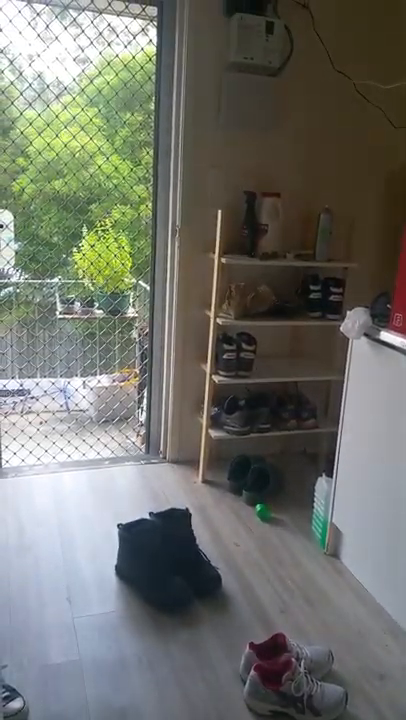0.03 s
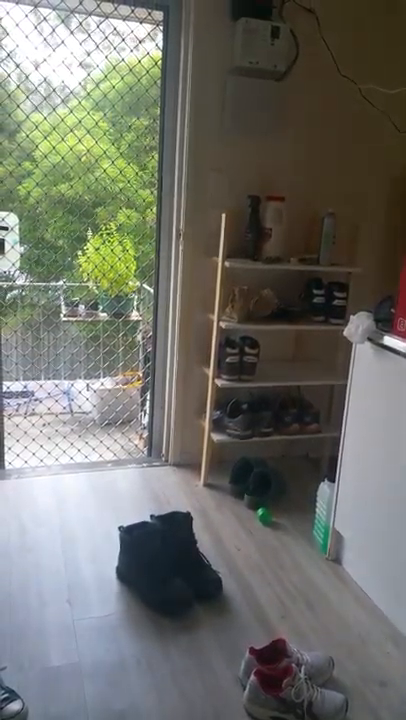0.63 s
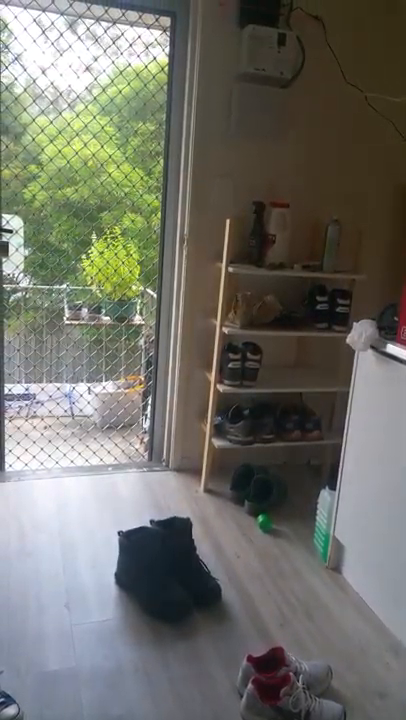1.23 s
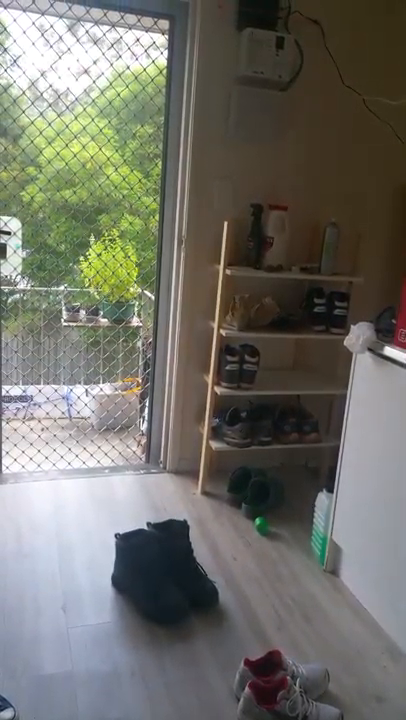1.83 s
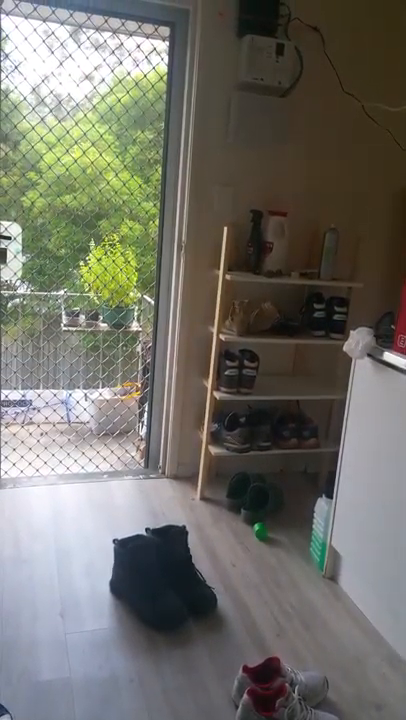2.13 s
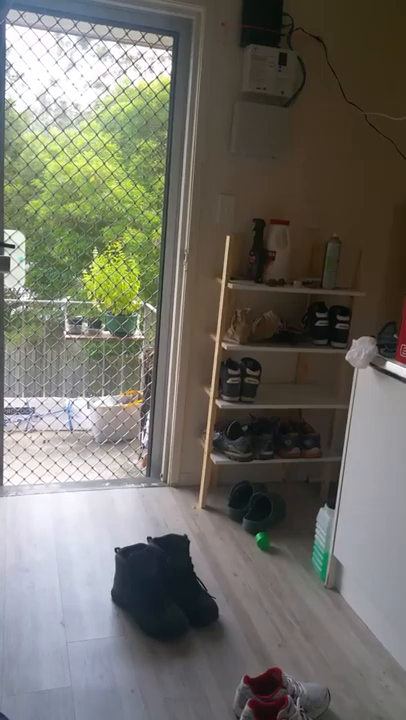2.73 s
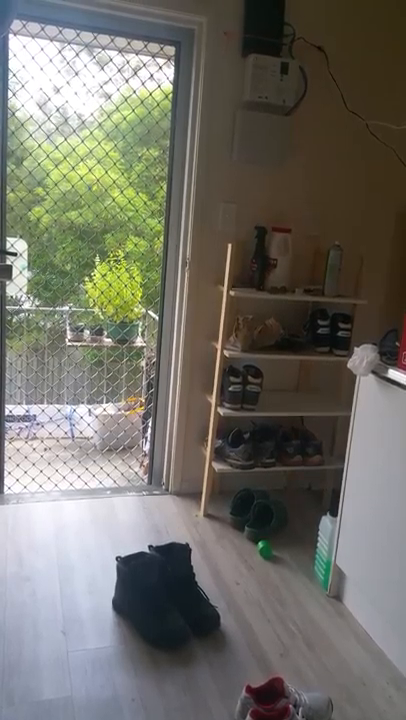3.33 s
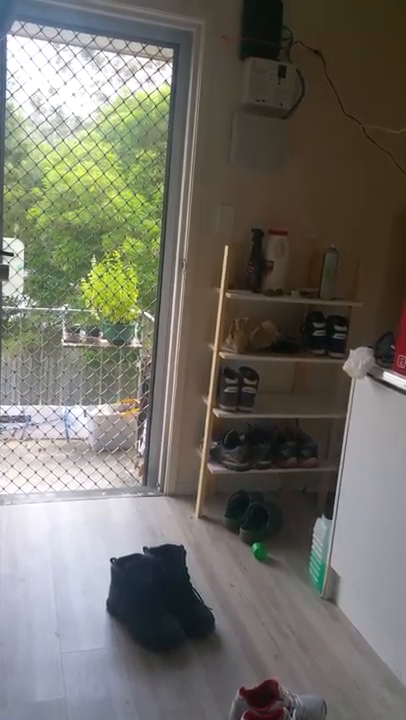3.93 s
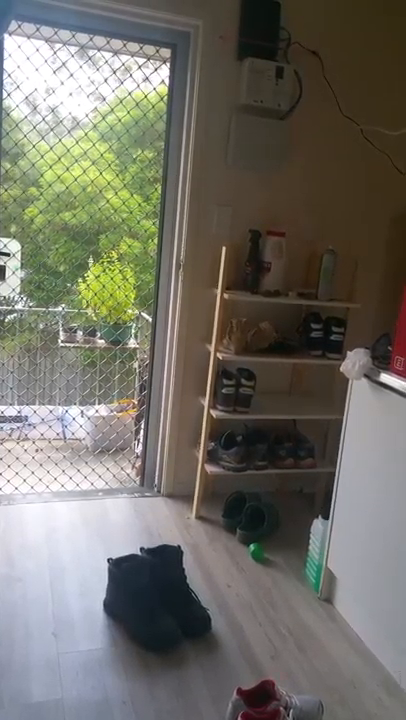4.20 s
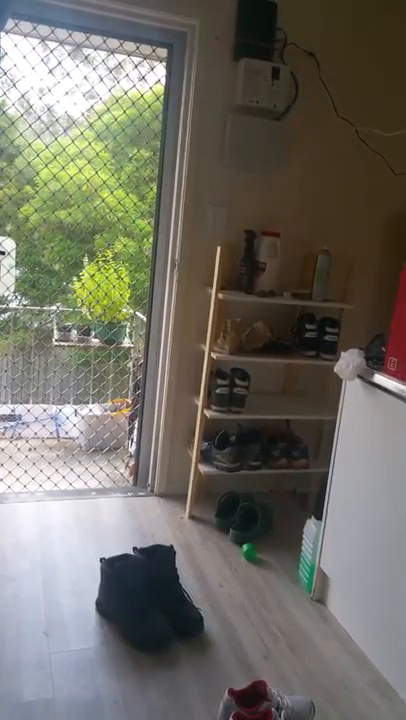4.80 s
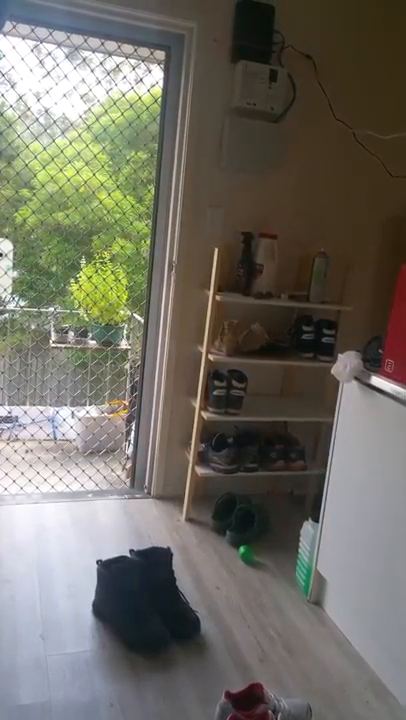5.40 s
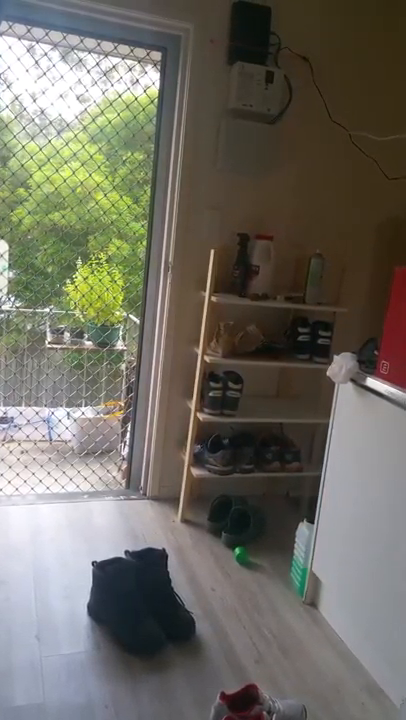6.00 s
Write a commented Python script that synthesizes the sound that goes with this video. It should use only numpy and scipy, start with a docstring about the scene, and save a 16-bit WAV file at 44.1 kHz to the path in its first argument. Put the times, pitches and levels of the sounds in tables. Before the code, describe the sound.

Soft outdoor hiss and distant traffic hum drift into a hallway through an open door. Close outside, a bird sings in short groups with pauses: sharp falling whistles, low hoots and fluting notes, with faint wails from a farther bird. After a loud wavering note and a final falling whistle, only the background and a slight nearby rustle remain. The microphone is indoors, where a short echo smears the notes.

```python
"""From a hallway with an open door: outdoor hiss and a low traffic hum throughout, and at first a faint murmur
of distant song. Just outside, a butcherbird whistles steep downward whips that crack as they break and end
in a soft hoot. Fluted notes come between them while another bird wails far off. One loud ringing note
leads to the last whip; a faint tick and rustle close the scene. The hard little room smears the slides
and makes the held notes throb."""
import sys
import numpy as np
from scipy import signal
from scipy.fft import rfft, irfft, next_fast_len
from scipy.io import wavfile
from scipy.ndimage import uniform_filter1d

SR = 44100
rng = np.random.default_rng(int(sys.argv[2]) if len(sys.argv) > 2 else 0)


def inscribe(sig):
    """Save sig as 16-bit PCM at rate SR to the path in sys.argv[1].

    A 1-D sig is mono; a 2-D sig holds one channel per row.
    Samples are clipped to [-1, 1] before scaling.
    """
    pcm = np.round(np.clip(np.atleast_2d(sig).T, -1, 1) * 32767)
    wavfile.write(sys.argv[1], SR, pcm.astype(np.int16))


N = 266893
TIME = np.arange(N) / SR
# Timbre of the ringing note. Each entry: relative level in dB, from harmonic 2 upward.
RING_TIMBRE = [-34, -41, -20, -36, -37.5, -52, -46, -53, -53, -46]


def undb(db):
    """Decibels to gain."""
    return 10 ** (np.asarray(db) / 20)


def unit(x):
    """Scale to rms 1."""
    return x / np.sqrt(np.mean(x ** 2))


def curves(rows):
    """Automation lanes: each column of a table, joined by straight lines in time."""
    times, *columns = np.transpose(rows)
    return [np.interp(TIME, times, column) for column in columns]


def along(hz, rows, axis=1):
    """One column of a table, read on a log-frequency axis."""
    rows = np.array(rows, float)
    return np.interp(np.log(hz + 1e-3), np.log(rows[:, 0]), rows[:, axis])


def colour(x, rows, axis=1):
    """EQ by a table of Hz and dB."""
    size = next_fast_len(x.shape[-1] + 2048)
    gain = undb(along(np.fft.rfftfreq(size, 1 / SR), rows, axis))
    return irfft(rfft(x, size) * gain, size)[..., :x.shape[-1]]


def walk(rate_hz):
    """Smooth random modulation of rms 1."""
    step = max(int(SR / rate_hz), 2)
    held = np.repeat(rng.standard_normal(N // step + 1), step)
    return unit(uniform_filter1d(uniform_filter1d(held, step), step)[:N])


def envelope(t, length_s, attack_s, release_s):
    """Attack, hold and release of a note that starts at t = 0."""
    return np.clip(np.minimum(t / attack_s, (length_s - t) / release_s), 0, 1)


def bell(centre_s, half_s):
    """A smooth swell of height 1."""
    return np.exp(-((TIME - centre_s) / half_s) ** 2)


def bursts(rows, spectrum):
    """Short swells of coloured noise."""
    swells = sum(undb(db) * bell(centre_s, half_s) for centre_s, db, half_s in rows)
    return swells * unit(colour(rng.standard_normal(N), spectrum))


def air(spectrum, db, sway_db):
    """A stereo noise bed that sways slightly, narrow in the bass and wide in the treble."""
    # Stereo image. Each row: frequency in Hz, likeness of the two sides from 0 to 1.
    likeness = [(60, 0.91), (180, 0.99), (350, 0.7), (700, 0.78), (1500, 0.23), (4000, 0), (12000, 0)]
    # Panning. Each row: frequency in Hz, left minus right in dB.
    balance = [(60, 2), (110, -0.5), (200, 1), (380, 1.5), (700, 0), (1290, 4.0), (2380, 8), (4400, -2),
               (8120, -3.5), (15000, 2.5)]
    hz, sign = np.fft.rfftfreq(N, 1 / SR), np.array([[1], [-1]])
    alike = along(hz, likeness)
    mid, side = rfft(rng.standard_normal((2, N)))
    pair = np.sqrt(1 + alike) * mid + sign * np.sqrt(1 - alike) * side
    eq = undb(along(hz, spectrum) + sign * along(hz, balance) / 2)
    return unit(irfft(pair * eq, N)) * undb(db + sway_db * walk(5.95))


def outdoors():
    """A low wash that slowly swells and sinks, under a quiet hiss."""
    # Colours of the wash and the hiss. Each row: frequency in Hz, relative level in dB.
    wash_eq = [(12, -39), (20, -9.5), (54, -4), (182, -9), (247, -7.5), (336, -14), (719, -13.5),
               (975, -17), (1050, -10.5), (1110, -21.5), (1200, -14), (1320, -16.5), (1900, -19),
               (2470, -52), (4180, -120)]
    hiss_eq = [(1000, -31), (1700, -12), (1780, -9.5), (1990, -0.5), (2270, -3.5), (2610, -6.5),
               (2780, -10.5), (3020, -7.5), (3440, -10), (3920, -5.5), (4680, -7.5), (6010, -15),
               (6720, -14), (8560, -26.5), (15600, -34.5)]
    # Fader ride of the wash. Each row: time in seconds, gain in dB.
    wash_ride = [(0, 0), (1.1, 1.5), (2.1, 0.5), (4.7, -0.5), (5.1, -1.5), (6.05, -1.3)]
    swell_db, = curves(wash_ride)
    return undb(swell_db) * air(wash_eq, db=-53, sway_db=1.4) + air(hiss_eq, db=-49.5, sway_db=0.6)


def traffic(hum_hz=62.4, waver=.025, throb_db=3, left_db=2.2):
    """A far engine drones, throbs and swells now and then; its octave grows near the end."""
    # Each row: centre in seconds, half length in seconds, fundamental boost in dB, octave boost in dB.
    swells = [(.92, .2, 6.5, 3), (2.62, 0.22, 9, -2), (4.3, 0.23, 7.5, 4), (5.552, 0.34, 6.5, 5),
              (5.9, .22, -1, 15)]
    low_db = -63 + sum(up_db * bell(s, half_s) for s, half_s, up_db, _ in swells)
    octave_db = -70 + sum(up_db * bell(s, half_s) for s, half_s, _, up_db in swells)
    phase = 2 * np.pi * np.cumsum(hum_hz * (1 + waver * walk(30))) / SR
    low = undb(low_db + throb_db * walk(24.9)) * np.sin(phase)
    octave = undb(octave_db + throb_db * walk(25)) * np.sin(2 * phase)
    return (low + octave) * undb([[left_db], [0]])


def murmur():
    """Distant song, blurred to a faint hollow noise."""
    # Each row: centre in seconds, level in dB, half length in seconds.
    swells = [(.08, -65, 0.097), (.36, -57.5, 0.2)]
    # Each row: frequency in Hz, relative level in dB.
    hollow_eq = [(400, -24), (600, -3), (740, 4), (1000, -10), (1400, -9), (2000, -41)]
    return bursts(swells, hollow_eq)


def syrinx(notes, overtones_db, jitter, shimmer_db, hoarse):
    """A trembling, nearly pure whistle whose membranes add slightly hoarse overtones when pressed."""
    out, tremble, flutter = np.zeros(N), walk(350), walk(200)
    grit = hoarse * walk(1200)
    for hz, gain, press_db in notes:  # a note is three curves: pitch, gain, overtone strength
        on = gain > 0
        pitch = uniform_filter1d(hz[on], size=130) * (1 + jitter * tremble[on])
        phase = 2 * np.pi * np.cumsum(pitch) / SR
        overtones = sum(undb(db) * np.sin(k * (phase + grit[on])) * (k * pitch < SR / 2)
                        for k, db in enumerate(overtones_db, 2))
        tone = np.sin(phase) + undb(press_db[on]) * overtones
        out[on] += gain[on] * undb(shimmer_db * flutter[on]) * tone
    return out


def whips():
    """Each high note is held, breaks, and falls fast then slower, warbling, fading and mellowing."""
    # Each row: start, attack, hold and length in seconds, top pitch in Hz, flick before the break in Hz,
    # time to fall halfway in seconds, level in dB, overtone strength in dB.
    cues = [(0.51, .016, .015, .086, 2290, 0, .021, -24.5, 5),
            (1.699, 0.023, .031, 0.15, 2200, 1, .017, -21.5, 7),
            (2.698, .022, .048, .179, 2235, 264.5, .0185, -21, 3),
            (4.263, 0.036, .041, 0.21, 2288, -3, .026, -21, 10)]
    # Each row: one whip's relative overtone levels in dB, from harmonic 2 upward.
    timbres = [
        [-15.5, -15.5, -40, -20.5, -28, -33],
        [-9, -26, -20.5, -16.5, -32, -52],
        [-7.5, -14.5, -22, -22.5, -46, -58],
        [-12.5, -9, -24.5, -29, -44, -44],
    ]
    sag_hz_per_s, floor_hz = 4600, 438
    flick_s, flick_db_per_hz = .009, 0.0568
    warble_hz, warble_share, warble_db = 34.48, 0.058, 2
    break_db, fade_db_per_s = 3, 123
    ease_db_per_s, mellow_db_per_octave = 249, 11.5
    out = np.zeros(N)
    for cue, timbre in zip(cues, timbres):
        start_s, attack_s, hold_s, length_s, top_hz, flick_hz, halfway_s, db, press_db = cue
        t = np.clip(TIME - start_s, 0, length_s)
        falling = np.maximum(t - hold_s, 0)
        flick = flick_hz * bell(start_s + hold_s - flick_s / 2, flick_s)
        held = top_hz - sag_hz_per_s * np.minimum(t, hold_s) + flick
        warble = np.sin(2 * np.pi * warble_hz * falling)  # the fall goes in small steps
        hz = (floor_hz + (held - floor_hz) / (1 + falling / halfway_s)) * (1 - warble_share * warble)
        lost_db = break_db * np.minimum(falling / halfway_s, 1) + fade_db_per_s * falling
        gain = envelope(t, length_s, attack_s, release_s=0.004) * undb(db - lost_db + warble_db * warble)
        # overtones fade as the pressure eases and the pitch drops
        mellow_db = ease_db_per_s * t + mellow_db_per_octave * np.log2(top_hz / hz)
        note = hz, gain, press_db - mellow_db + flick_db_per_hz * flick
        out += syrinx([note], timbre, jitter=0.0082, shimmer_db=2.5, hoarse=0.14)
    return out


def rasps():
    """The voice cracks with a short rasp where the pitch breaks."""
    # Each row: centre in seconds, level in dB, half length in seconds.
    cracks = [(.526, -54, 0.0038), (1.733, -41, 0.0077), (2.234, -57, 0.007), (2.325, -54.5, 0.019),
              (2.752, -43, 0.012), (4.309, -45, 0.0053)]
    # Each row: frequency in Hz, relative level in dB.
    rasp_eq = [(1200, -39), (2500, 7.5), (4000, -5), (6500, -16), (8000, -7), (10200, 10.5), (12000, -20),
               (15000, -15)]
    return bursts(cracks, rasp_eq)


def hoots(press_db=-19):
    """Short mellow notes for the syrinx that slide evenly upward."""
    # Each row: start and length in seconds, pitch and rise in Hz, level in dB.
    cues = [(.603, .03, 835, 20, -19.5), (0.718, 0.05, 672, 22, -28), (1.89, .08, 683, 62, -30),
            (2.914, 0.043, 675, 11, -29.5), (3.85, 0.042, 1084, 314, -34.5), (4.469, .08, 677.6, 30, -30.5)]
    for start_s, length_s, pitch_hz, rise_hz, db in cues:
        t = np.clip(TIME - start_s, 0, length_s)
        gain = envelope(t, length_s, attack_s=0.018, release_s=0.0099) * undb(db)
        yield pitch_hz + rise_hz * t / length_s, gain, np.full(N, press_db)


def flutes(scoop_share=.055, lift_share=.16, waver=.009, ease_db_per_s=35):
    """Low notes for the syrinx: each scoops down onto its pitch, catches once, mellows and lifts."""
    # Each row: start and length in seconds; pitch, scoop and closing lift in Hz; level and overtone
    # strength in dB; time of the catch in seconds; its depth and the accent after it in dB.
    cues = [(1.332, .073, 778, 296, -20, -28.5, -12, 1.359, 24, 4),
            (1.453, .113, 779.6, 150, 49, -27, -14, 1.478, 16, 2.5),
            (2.225, .293, 916, 440, 130, -28, -1, 2.400, 9, 0)]
    for start_s, length_s, pitch_hz, scoop_hz, lift_hz, db, press_db, catch_s, catch_db, accent_db in cues:
        t = np.clip(TIME - start_s, 0, length_s)
        done = t / length_s
        hz = pitch_hz + scoop_hz * np.exp(-done / scoop_share) + lift_hz * np.exp((done - 1) / lift_share)
        half_s = .007 + 0.095 * length_s  # longer notes catch for longer
        catch = catch_db * np.minimum(2 * bell(catch_s, half_s) ** 2, 1)
        accent = accent_db * np.clip((TIME - catch_s) / half_s, 0, 1)
        gain = envelope(t, length_s, attack_s=0.0062, release_s=0.0067) * undb(db - catch + accent)
        yield hz * (1 + waver * walk(50)), gain, press_db - ease_db_per_s * t


def far_bird(waver=0.0052, flicker_db=2.5, fade_s=0.041, harmonics=13):
    """Long wails from across the gardens that sag at the end; only their middle overtones carry."""
    # Each row: start and length in seconds, pitch and closing sag in Hz, level before the EQ in dB.
    calls = [(1.38, 0.4, 592.7, 14.3, -53), (2.302, .44, 255, 3, -56), (2.9, .44, 260, 23, -49.5)]
    # Each row: frequency in Hz, gain in dB.
    wail_eq = [(900, -37), (1180, 3), (1235, -7), (1290, -3), (1440, 7.5), (1540, -13), (1680, -5),
               (1800, 0), (1950, -7), (2300, -26), (2800, -17.5), (3130, -6.5), (3500, -37)]
    out, drift = np.zeros(N), 1 + waver * walk(60)
    for start_s, length_s, pitch_hz, sag_hz, db in calls:
        on = (TIME > start_s) & (TIME < start_s + length_s)
        t = TIME[on] - start_s
        hz = (pitch_hz - sag_hz * (t / length_s) ** 2) * drift[on]
        phase = 2 * np.pi * np.cumsum(hz) / SR
        tone = sum(np.sin(k * phase) for k in range(1, harmonics + 1))
        out[on] += envelope(t, length_s, fade_s, fade_s) * undb(db) * tone
    return colour(out, wail_eq) * undb(flicker_db * walk(24.36))


def ringing_note(start_s=3.892, length_s=.226, fade_db_per_s=16, bright_db=4):
    """A loud, wavering tone whose overtones come and go; it bends down and loses them as it ends."""
    # Each row: time in seconds, pitch in Hz, strongest overtone in dB before brightening and mellowing.
    contour = [(3.9, 1314, -39.5), (3.928, 1377, -42.5), (3.944, 1288, -47), (3.962, 1310, -41.5),
               (3.976, 1338, -57), (3.988, 1349, -48), (4.014, 1367, -52), (4.026, 1296, -52),
               (4.06, 1326, -32), (4.075, 1293, -41)]
    drop_hz, drop_s, mellow_db_per_hz = 570, 0.01296, 0.2
    t = np.clip(TIME - start_s, 0, length_s)
    hz, overtone_db = curves(contour)
    drop = drop_hz * np.exp((t - length_s) / drop_s)
    db = -16.5 - fade_db_per_s * t
    gain = envelope(t, length_s, attack_s=.004, release_s=.055) * undb(db)
    press_db = overtone_db - db - max(RING_TIMBRE) + bright_db - mellow_db_per_hz * drop
    return syrinx([(hz - drop, gain, press_db)], RING_TIMBRE, jitter=0.003, shimmer_db=1.8, hoarse=0.034)


def butcherbird():
    """The whole phrase: rough-edged whips, mellow hoots and flutes, one ringing note."""
    # Timbre of hoots and flutes. Each entry: relative level in dB, from harmonic 2 upward.
    mellow_timbre = [-8.5, -23, -28.5, -26.5, -27, -24.5, -47, -42, -49, -31.5, -36, -34, -34]
    rough = whips()
    mellow = syrinx([*hoots(), *flutes()], mellow_timbre, jitter=0.012, shimmer_db=2.0, hoarse=0.082)
    return rough + mellow + ringing_note() + rasps()


def rustle():
    """A faint tick and a soft, bright rustle nearby."""
    # Each row: centre in seconds, level in dB, half length in seconds.
    touches = [(5.555, -57, .002), (5.57, -73, .018), (5.835, -67, .015), (5.89, -71, 0.055)]
    # Each row: frequency in Hz, relative level in dB.
    rustle_eq = [(2000, -30), (6000, -2), (9000, 5), (12000, -8), (15500, -8)]
    return bursts(touches, rustle_eq)


def tail(t60_s, treble_t60_s, onset_s, crossover_hz=3500):
    """Dense echoes that build up and die away, the treble sooner."""
    t, noise = TIME[:SR], rng.standard_normal(SR)
    low = signal.sosfilt(signal.butter(2, crossover_hz, fs=SR, output="sos"), noise)
    high = signal.sosfilt(signal.butter(2, crossover_hz, "high", fs=SR, output="sos"), noise)
    rise = 1 - np.exp(-t / onset_s)
    slow, fast = (rise * np.exp(-np.log(1000) * t / s) for s in (t60_s, treble_t60_s))
    return (low * slow - high * fast) / np.sqrt(np.sum(slow ** 2))


def hall_modes(side, t60_s=0.21):
    """Impulse response of the standing waves between the walls."""
    # Each row: pitch in Hz, left and right gain in dB.
    resonances = [(825, 0.5, -4), (908, -2, -11), (1092, 20.5, 9), (1180, -22, -15), (1260, -24, -21),
                  (1390, -5, -23), (1460, -22, -14), (1680, -26, -17), (1680, -10, -24), (1840, -6, -19),
                  (1950, -2, -11), (2080, -5, -21), (2340, -17, -22)]
    t, fade = TIME[:SR], np.log(1000) / t60_s
    waves = sum(undb(row[side + 1]) * np.cos(2 * np.pi * row[0] * t) for row in resonances)
    return 2 * fade / SR * np.exp(-fade * t) * waves


def hallway(x, right_lead_ms=0.19):
    """Each side hears the doorway, hard reflections, the room's modes and reverb, and a garden echo."""
    # Bounces off floor, walls and door frame. Each row: left and right delay in milliseconds, gain in dB.
    reflections = [(3.1, 4.1, -49.5), (7.4, 4, -10), (12.3, 11, -10.5), (19.5, 14, -16)]
    # The doorway's shading and the reverb's colour. Each row: frequency in Hz, left and right gain in dB.
    doorway_eq = [(650, -7, -3.5), (827, -1.5, 0), (1000, 2, 0.5), (1270, 0.5, -4), (1754, 0, -5.5),
                  (2110, 9.5, -0.5), (4360, -3, -4), (7300, -8, 6.5), (11140, -11.5, -0.5)]
    reverb_eq = [(680, -7, -6), (950, 5.5, 1.5), (1420, 4.5, 6), (1830, 9.5, -3), (4500, -5, -5),
                 (6900, -1.5, 6.5), (11100, -1.5, 1.5)]
    sides = []
    for side in range(2):
        early = np.interp(TIME + side * right_lead_ms / 1000, TIME, x)
        for row in reflections:
            early += undb(row[2]) * np.interp(TIME - row[side] / 1000, TIME, x)
        diffuse = undb(-4) * tail(t60_s=0.37, treble_t60_s=0.25, onset_s=0.0055)
        garden = undb(-21.5) * tail(t60_s=1.17, treble_t60_s=0.585, onset_s=0.06)
        response = colour(diffuse + garden, reverb_eq, axis=side + 1) + hall_modes(side)
        sides.append(colour(early, doorway_eq, axis=side + 1) + signal.fftconvolve(x, response)[:N])
    return np.array(sides)


def scene():
    """Birds and rustle sound through the hallway, over the outdoor bed and the hum."""
    bed = outdoors()
    distant = far_bird() + murmur()
    return hallway(butcherbird() + distant + rustle()) + bed + traffic()


def record(dry):
    """A steep low-pass trims the very top."""
    top_hz = 15750
    return signal.sosfilt(signal.ellip(10, .1, 80, top_hz, fs=SR, output="sos"), dry)


dry = scene()
out = record(dry)
inscribe(out)
```